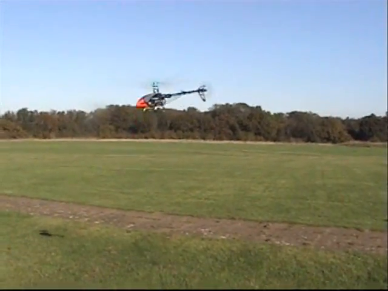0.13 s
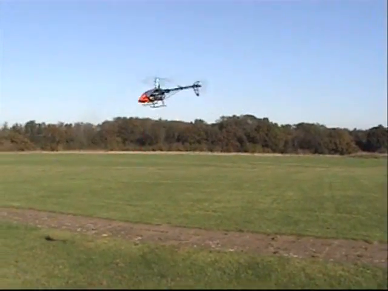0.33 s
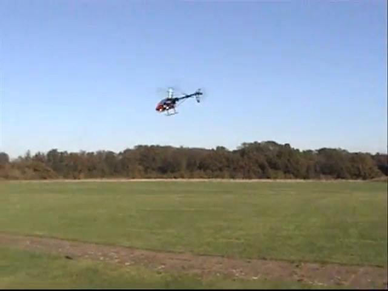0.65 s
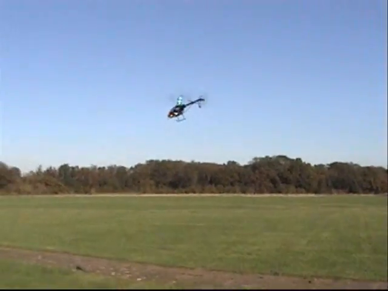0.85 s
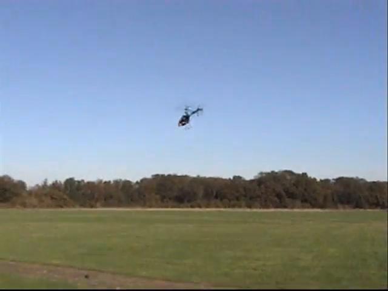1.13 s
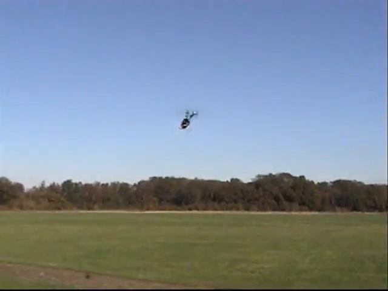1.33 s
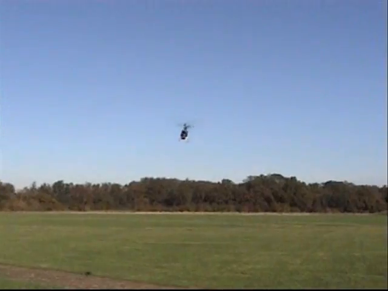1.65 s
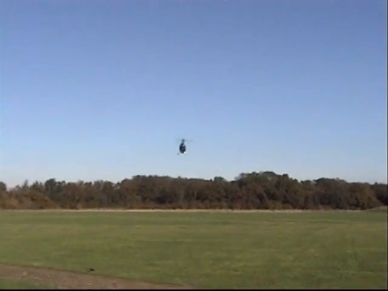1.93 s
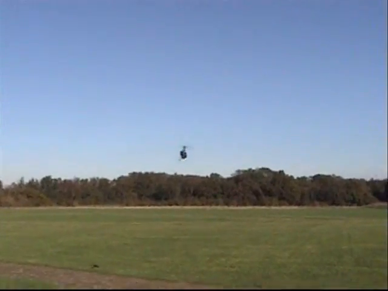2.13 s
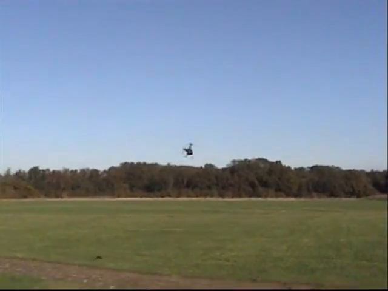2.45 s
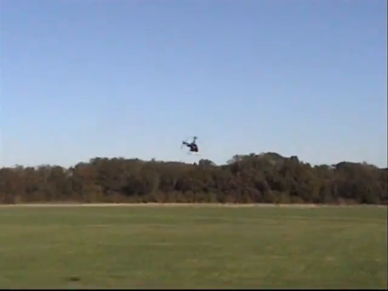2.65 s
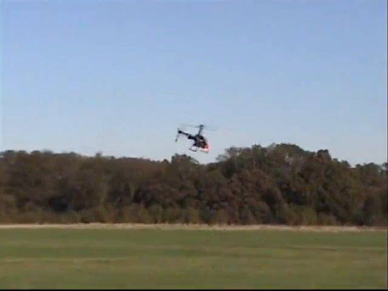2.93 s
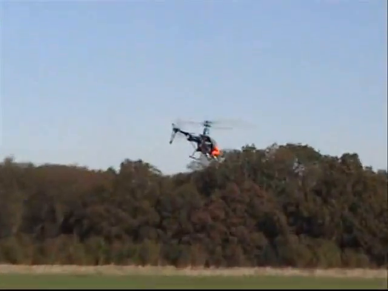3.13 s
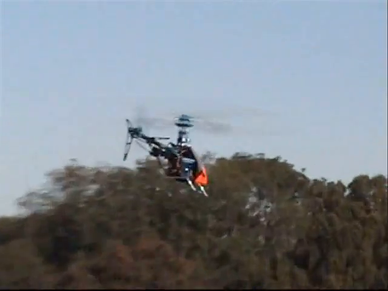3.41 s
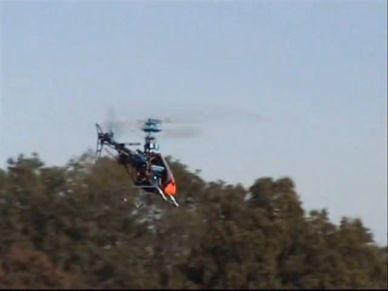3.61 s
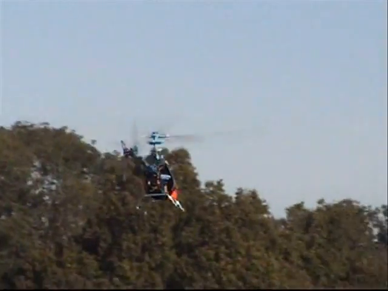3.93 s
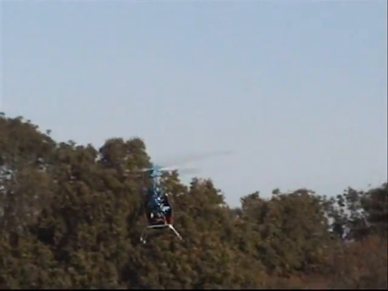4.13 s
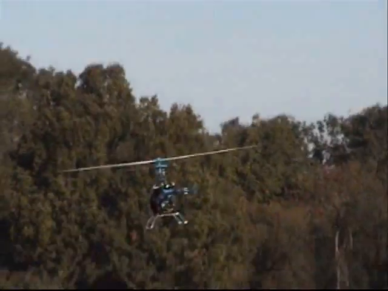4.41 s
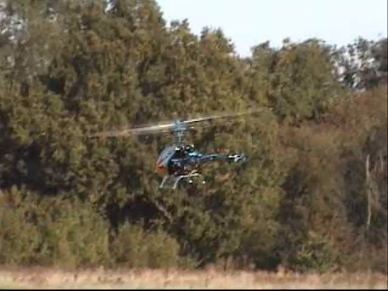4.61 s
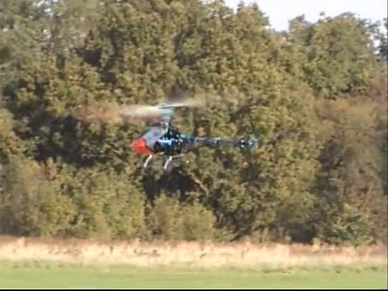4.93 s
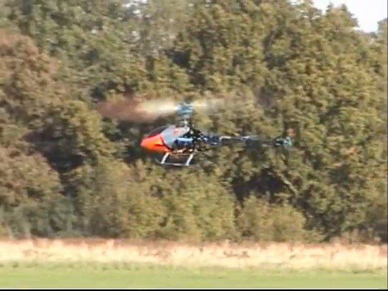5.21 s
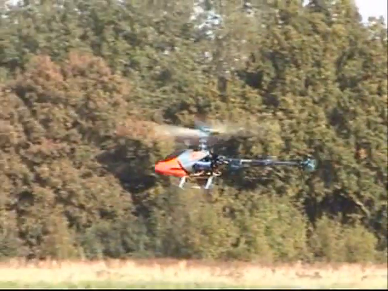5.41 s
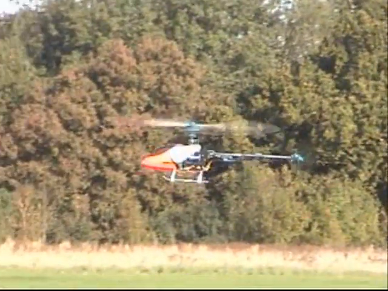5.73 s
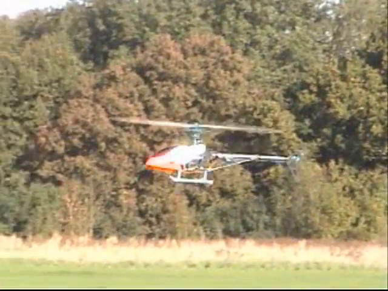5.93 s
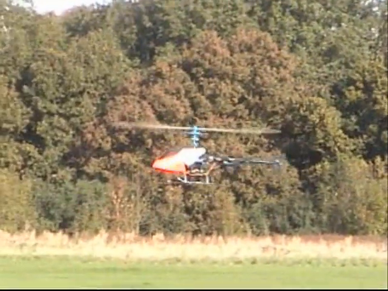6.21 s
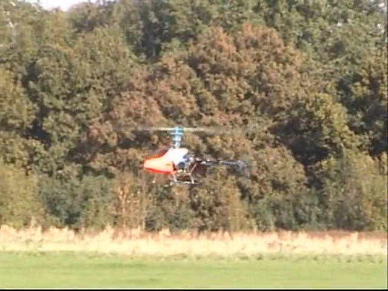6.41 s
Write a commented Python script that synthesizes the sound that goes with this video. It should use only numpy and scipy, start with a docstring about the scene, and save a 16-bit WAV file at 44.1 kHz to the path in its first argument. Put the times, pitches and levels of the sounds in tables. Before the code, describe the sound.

A small electric model helicopter flies over a mown field, heard continuously by a handheld stereo microphone. At 0 s it is nearest and loudest: strong motor tones, a high shimmering gear whine, bright hiss and fast fluttering blade wash. From about 0.5 s the whine locks into a rapid, regular pulse, and the level eases until about 1.8 s. The pitch sags very slightly around 2 s, then recovers. Tail-rotor buzz dips near 1.8 s and becomes prominent from 2.4 to 4 s, while motor tones swell and fade. A short plastic tap lands at 3.7 s and a softer, duller one at 4.4 s. Pitch sags again around 4.5 s; the low buzz then thins away. From 5 s the hover is steadier and softer, with whine and motor tones briefly rising around 5.7 s before easing. Faint grass echo colours the tones, and light wind rumble grows gently. It ends still running.

```python
"""Small electric model helicopter

It circles over a mown field and hovers in front of a hand-held camera.
One rotor speed drives every tone: tail rotor buzz, motor tones and a pulsing gear whine.
Shaped noise makes the hiss of the blades and gears, the ringing frame and the wind.
The grass throws back an echo that comes sooner as the model flies lower; two knocks tap the camera."""
import sys
import numpy as np
from scipy import signal
from scipy.fft import rfft, irfft
from scipy.io import wavfile
from scipy.ndimage import map_coordinates

SR = 44100
rng = np.random.default_rng(int(sys.argv[2]) if len(sys.argv) > 2 else 0)


def to_wav(s):
    """Save 16-bit WAV."""
    ch = np.atleast_2d(s).T  # columns
    pcm = np.round(np.clip(ch, -1, 1) * 32767)  # PCM
    wavfile.write(sys.argv[1], SR, pcm.astype(np.int16))


N = 289296
T = np.arange(N) / SR  # time of each sample, s
HZ = np.fft.rfftfreq(N, 1 / SR)  # frequency of each bin, Hz

# turns of the motor and tail shaft, and beats of the gears, for each turn of the main rotor
MOTOR_RATIO, TAIL_RATIO, BEAT_RATIO = 41 / 3, 17 / 4, 5


def amp(db):
    """Decibels to gain."""
    return 10 ** (np.asarray(db) / 20)


def unit(x):
    """Scales to rms 1."""
    return x / np.sqrt(np.mean(x ** 2) + 1e-20)


def curves(rows):
    """Each column of a timed table, joined by straight lines, at every sample."""
    s, *columns = np.transpose(rows)
    return [np.interp(T, s, column) for column in columns]


def spectrum(points):
    """A table over frequency, at every bin."""
    hz, value = np.transpose(points)
    return np.interp(np.log(HZ + 1), np.log(hz + 1), value)


def noise(gain):
    """Noise of rms 1 with the given relative gain per bin."""
    bins = rng.standard_normal(len(HZ)) + 1j * rng.standard_normal(len(HZ))
    return unit(irfft(gain * bins, N))


def drift(rate_hz, size=4096):
    """A slow random wander of rms 1, moving up to about rate_hz."""
    hz = np.arange(size // 2 + 1) * SR / N
    slow = irfft(rfft(rng.standard_normal(size)) / (1 + (hz / rate_hz) ** 2))
    return np.interp(T, np.linspace(0, T[-1], size), unit(slow))


def tone(turns, db, stray=0):
    """A sine of the given rms level, its phase pushed by stray radians."""
    return np.sqrt(2) * amp(db) * np.cos(2 * np.pi * turns + stray)


def throb(turns, depth):
    """Gain that swells once a turn."""
    return 1 + depth * np.cos(2 * np.pi * turns)


def shaken(turns, db, flutter_db, jitter, rate_hz):
    """A tone whose level (rms dB) and phase (rms radians) flutter in the stirred air."""
    return tone(turns + rng.random(), db + flutter_db * drift(rate_hz), jitter * drift(rate_hz))


def motor(turns):
    """A low hum and three strong multiples of motor speed, throbbing with each turn of the main gear."""
    # which multiples of motor speed sound
    motor_orders = (1, 4, 5, 7)
    # their levels before the trim, swelling and fading through the flight:
    # (t/s, order 1 level/dB, order 4 level/dB, order 5 level/dB, order 7 level/dB)
    motor_levels = [(0, -40, -44, -35, -27.5), (.45, -45, -42, -34, -31), (1.15, -50.5, -43, -45, -45),
                    (1.9, -46, -45, -50, -34), (2.22, -43.5, -41, -46, -28.5), (2.5, -43, -38, -43, -27),
                    (2.9, -48.5, -38.5, -39, -29), (3.5, -48.5, -38.5, -40.5, -31),
                    (4.25, -48.5, -43, -44, -35), (4.85, -47, -44, -53, -39), (5.35, -47.5, -52, -42, -48),
                    (5.72, -45.5, -41, -35.5, -33), (6.05, -47, -40.5, -37, -38), (6.3, -50, -42, -43, -36),
                    (6.56, -49.5, -42, -47, -40)]
    # how deeply they throb with each rotor turn: (t/s, depth 0-1)
    throb_depth = [(0, 0), (2, 0.27), (3.5, 0.19), (4.4, 0.26), (4.8, 0.2), (5.3, 0.23), (6.56, 0.33)]
    depth = np.clip(curves(throb_depth)[0], 0, 1)
    tones = 0
    for k, db in zip(motor_orders, curves(motor_levels)):
        steady = shaken(k * MOTOR_RATIO * turns, db, flutter_db=0.6, jitter=0.12, rate_hz=4)
        tones = tones + steady * throb(turns + rng.random(), depth)
    return amp(-0.2) * tones * throb(2 * turns, depth=0.059)


def gear_whine(turns):
    """Three close tones: in step they pulse five times a rotor turn, out of step they shimmer."""
    whine_order = 11  # middle tone, as a multiple of motor speed
    # the middle tone and one a beat to each side, before the trim:
    # (t/s, lower level/dB, middle level/dB, upper level/dB)
    whine_levels = [(0, -28.5, -30.5, -51), (.6, -31.5, -25, -31), (1.2, -31, -33, -34.5),
                    (1.8, -34.5, -41.5, -32), (2.45, -43.5, -31.5, -32.5), (2.9, -39, -38.5, -35),
                    (3.3, -30.5, -41, -40), (3.45, -38, -38.5, -39.5), (3.7, -31.5, -36, -43),
                    (4.2, -43.5, -46, -39), (4.8, -37.5, -30, -39), (5.1, -36.5, -32.5, -39),
                    (5.4, -60, -42, -41), (5.75, -41, -33.5, -30.5), (6.1, -37.5, -39.5, -51),
                    (6.56, -39.5, -37, -56)]
    # how far the three stray out of step: (t/s, rms phase/radians)
    stray_size = [(0, 3.2), (.5, .05), (1.5, .08), (3, .8), (4.3, 1.3), (4.7, 0.21), (5.2, .2), (5.5, 1.1),
                  (6.56, 1)]
    stray = curves(stray_size)[0]
    shared = .16 * drift(25)  # phase wander common to all three
    tones = 0
    for k, db in enumerate(curves(whine_levels)):
        ratio = whine_order * MOTOR_RATIO + (k - 1) * BEAT_RATIO
        tones = tones + tone(ratio * turns, db + 0.9 * drift(5.1), stray * drift(1.8) + shared)
    # the teeth press hardest on each beat, which sharpens the pulses
    return amp(-0.12) * tones * throb(BEAT_RATIO * turns, depth=0.11) * throb(turns, depth=0.13)


def gear_mesh(turns, near_db):
    """Meshing teeth sound beside motor orders; the low ones carry sideways, the high ones fore and aft."""
    # tones of the meshing teeth: (motor order, beats to the side)
    mesh_orders = [(4, -1), (4, 1), (7, -1), (8, 0), (12, 0)]
    # one row for each: (level/dB at the mean distance before the trim, gain when side on/dB)
    mesh_levels = [(-46.5, 2.5), (-49.5, 8), (-42, -3), (-44, -7.5), (-43.5, -5)]
    # how far the model shows its left flank: (t/s, 0 nose or tail on - 1 side on)
    flank_view = [(0, 0.7), (.6, 1), (1.6, 0), (4.3, 0), (4.8, 0.66), (5.6, 1), (6.56, 1)]
    flank = curves(flank_view)[0]
    tones = 0
    for (k, side), (db, flank_db) in zip(mesh_orders, mesh_levels):
        mesh_turns = (k * MOTOR_RATIO + side * BEAT_RATIO) * turns + 0.26 * drift(0.89)
        tones = tones + shaken(mesh_turns, db + flank_db * flank, flutter_db=1.5, jitter=0.087, rate_hz=7)
    return amp(1.6 * near_db - 1.6) * tones * throb(turns, depth=0.059)


def runout(turns, near_db):
    """A main gear slightly out of true spreads faint tones one rotor turn apart around strong gear tones."""
    # (motor order in the middle, tones to each side)
    runout_orders = [(7, 4), (11, 7)]
    # one for each order: level/dB at the middle, from which the side tones fall 1 dB a step
    runout_levels = [-53, -50]
    tones = 0
    for (k, count), db in zip(runout_orders, runout_levels):
        for side in range(-count, count + 1):
            if side % BEAT_RATIO:  # leaves out the middle and whole beats
                tones = tones + shaken((k * MOTOR_RATIO + side) * turns, db - 1.0 * abs(side),
                                       flutter_db=2.0, jitter=.3, rate_hz=3.3)
    return amp(near_db) * tones


def tail_rotor(turns):
    """Two small blades chop the air: a buzz and its octave."""
    # both tones before their trims, fading as the disc turns to face the camera:
    # (t/s, buzz level/dB, octave level/dB)
    buzz_levels = [(0.03, -46.5, -48), (0.46, -47, -35.5), (1.15, -40.5, -45.5), (1.51, -45, -46),
                   (1.8, -69, -55), (1.94, -47, -52), (2.05, -43.5, -65), (2.43, -37.5, -45),
                   (2.73, -36.5, -50.5), (3.07, -38, -45), (3.76, -38.5, -47), (4.08, -38.5, -61),
                   (4.64, -46, -52.5), (5.04, -59, -38.5), (5.8, -56.5, -51.5), (5.92, -53, -44.5),
                   (6.5, -56.5, -50.5)]
    blade_db, octave_db = curves(buzz_levels)
    blades = 2 * TAIL_RATIO * turns
    buzz = shaken(blades, blade_db, flutter_db=0.7, jitter=.05, rate_hz=12)
    octave = shaken(2 * blades, octave_db, flutter_db=0.7, jitter=.12, rate_hz=9)
    return amp(-1.15) * buzz + amp(-0.1) * octave


def overtones(turns, near_db):
    """Many weaker tones at multiples of the shaft speeds; drive and tail grow louder when near."""
    # drive tones: (motor order, beats to the side)
    drive_orders = [(1, 1), (2, 0), (3, 0), (5, -1), (5, 1), (6, -1), (5, 2), (6, 0), (7, 1), (7, 2),
                    (8, 1), (10, -1), (10, 0), (11, -2), (12, -1), (11, 2), (12, 1), (15, -1)]
    # one for each drive tone: level/dB before distance and trim
    drive_levels = [-47.5, -52, -65, -53, -53.5, -51, -57.5, -52.5, -47.5, -46.5, -51.5, -51.5, -46, -44.5,
                    -46.5, -45, -54, -66.5]
    # tail tones: multiples of tail shaft speed
    tail_orders = (4, 8, 10, 11, 12, 25)
    # one for each tail tone: level/dB before distance and trim
    tail_levels = [-57, -58, -68, -49.5, -54, -54]
    # main rotor tones: multiples of rotor speed
    rotor_orders = (2, 4, 6, 18, 19, 21, 36)
    # one for each rotor tone: level/dB before the trim
    rotor_levels = [-53, -56.5, -59.5, -56, -57.5, -57.5, -60]
    drive = 0
    for (k, side), db in zip(drive_orders, drive_levels):
        # stirred air disturbs high tones more than low ones
        drive = drive + shaken((k * MOTOR_RATIO + side * BEAT_RATIO) * turns, db,
                               flutter_db=1.1 * np.sqrt(k), jitter=0.12 * np.sqrt(k), rate_hz=11)
    tail = sum(shaken(k * TAIL_RATIO * turns, db, flutter_db=3.0, jitter=0.25, rate_hz=1.5)
               for k, db in zip(tail_orders, tail_levels))
    rotor = sum(shaken(k * turns, db, flutter_db=1.0, jitter=0.42, rate_hz=2.8)
                for k, db in zip(rotor_orders, rotor_levels))
    near_tones = drive * throb(turns, depth=0.11) + tail
    return amp(1.0 * near_db - 2.04) * near_tones + amp(0.85) * rotor


def blade_wash(turns, wash_db, bite_db):
    """Turbulence off the main blades, swishing as each one passes, with a brighter edge when they bite."""
    # colour of the wash: (f/Hz, relative level/dB)
    wash_colour = [(100, -7), (220, -4.5), (330, -1), (460, -3.5), (720, 3), (950, 3.5), (1200, -4),
                   (1600, -14), (5000, -34)]
    # colour of its bright edge: (f/Hz, relative level/dB)
    bite_colour = [(700, -29.5), (1100, 2), (1350, 1.5), (1560, -1.5), (1900, -6.5), (2400, 0.5),
                   (3200, -26)]
    edge = amp(bite_db - 6.5) * noise(amp(spectrum(bite_colour)))
    air = noise(amp(spectrum(wash_colour))) + edge
    return amp(wash_db + 2.5) * air * throb(2 * turns, depth=0.23)


def drive_hiss(turns, hiss_db, sheen_db):
    """Rubbing teeth and belt hiss in time with the beat and ring the frame."""
    # colour of the hiss: (f/Hz, relative level/dB)
    hiss_colour = [(900, -35), (1600, -7.5), (1900, -0.5), (2500, -2), (3250, -0.5), (4250, 1), (4900, -1),
                   (6000, -3), (7000, -8), (8300, -35)]
    # colour of its high sheen: (f/Hz, relative level/dB)
    sheen_colour = [(4500, -19.5), (5500, -1), (6400, 1.5), (7000, 1), (7650, 1), (8000, -5), (8300, -37.5)]
    # ringing frame, as bands of noise: (f/Hz, width/Hz, relative level/dB)
    frame_bands = [(3710, 370, 0), (5770, 840, -1.5), (2070, 540, -20)]
    sheen = amp(sheen_db + .5) * noise(amp(spectrum(sheen_colour)))
    hiss = amp(4.0) * noise(amp(spectrum(hiss_colour))) + sheen
    ring = sum(amp(db - 2.5) * noise(1 / (1 + (2 * (HZ - hz) / width) ** 2))
               for hz, width, db in frame_bands)
    beats = BEAT_RATIO * turns
    rub = hiss * throb(beats, depth=0.42) + ring * throb(beats, depth=0.31)
    return amp(hiss_db) * rub * throb(turns, depth=0.069) * throb(MOTOR_RATIO * turns, depth=0.2)


def ground(x, bounce):
    """Adds the late copy off the grass: tones swell and dip as the echo's lag changes."""
    # how late the echo is: (t/s, lag/ms)
    ground_lag = [(0, 4.22), (.5, 4.54), (1, 4.13), (1.6, 4.04), (2, 3.52), (2.5, 2.84), (3, 2.57),
                  (3.5, 2.32), (4, 2.11), (4.5, 1.63), (4.8, 1.33), (5.1, 1.22), (5.6, 1.12), (6.03, .93),
                  (6.56, 1.21)]
    lag = curves(ground_lag)[0] * SR / 1000  # in samples
    echo = map_coordinates(x, [np.arange(N) - lag], order=1)
    return (x + bounce * echo) / np.sqrt(1 + bounce ** 2)


def knocks():
    """Brief taps scuff and ring the camera's plastic case."""
    # each tap: (t/s, level/dB, pitch factor)
    taps = [(3.661, -26.5, 1.0), (4.355, -32, 0.35)]
    # ringing of the case before the pitch factor: (f/Hz, relative level/dB, time to fall 60 dB/s)
    case_modes = [(875, -5, 0.079), (1230, -11, .04), (1450, -4.5, 0.044), (1710, -13.5, 0.027),
                  (1910, -4, 0.017)]
    # colour of the scuff: (f/Hz, relative level/dB)
    scuff_colour = [(400, -20), (800, 3.5), (1800, 1), (2600, -3), (4500, -18)]
    out, t = np.zeros(N), T[:SR // 8]
    for s, level_db, pitch in taps:
        ring = 0
        for hz, db, t60 in case_modes:
            fade = np.exp(-np.log(1000) * t / t60)
            ring = ring + amp(db) * fade * np.sin(2 * np.pi * (hz * pitch * t + rng.random()))
        scuff = amp(-8) * noise(amp(spectrum(scuff_colour)))[:len(t)] * np.exp(-t / 0.015)
        out[round(s * SR):][:len(t)] += amp(level_db) * (amp(3.0) * ring + scuff)
    return out


def wind():
    """A light breeze rumbles on the microphone, mostly alike in both ports."""
    # colour of the rumble: (f/Hz, relative level/dB)
    wind_colour = [(15, -33.5), (30, -18.5), (50, -5.5), (80, 0.5), (120, -2.5), (200, -6.5), (350, -13.5),
                   (800, -32)]
    # the breeze picks up: (t/s, level/dB before the trim)
    gusts = [(0, -48), (2.5, -44.5), (6.56, -42)]
    shared, left, right = (noise(amp(spectrum(wind_colour))) for _ in range(3))
    return amp(curves(gusts)[0] - 1.3) * (shared + 0.5 * np.array([left, right]))


def scene():
    """The helicopter with its ground echo, noise that widens the sound, wind and knocks."""
    # main rotor speed as heard, sagging under load in the two turns: (t/s, speed/turns per second)
    rotor_speed = [(0, 39.595), (.2, 39.467), (.6, 39.325), (1.0, 39.25), (1.45, 39.225), (2.0, 39.09),
                   (2.35, 39.345), (2.8, 39.44), (3.4, 39.48), (4.15, 39.165), (4.6, 39.1), (5.0, 39.485),
                   (5.2, 39.49), (5.45, 39.41), (6.0, 39.49), (6.56, 39.5)]
    # how close the model is: (t/s, level against its mean distance/dB)
    closeness = [(0, 5), (.9, 2.5), (1.8, 0.55), (2.5, 1.4), (3.6, 0.2), (4.3, -1.5), (5.2, -2),
                 (5.75, -1.3), (6.56, -4)]
    # how hard the main blades bite: (t/s, bright edge before its trim/dB)
    blade_load = [(0, 6), (1.2, 6.5), (1.75, -4), (2.15, 6), (2.6, -13), (3.15, 0.5), (3.9, -4), (4.75, -7),
                  (5.15, -0.5), (6.56, 3)]
    # grass reflects better at a grazing angle: (t/s, gain of the echo)
    ground_bounce = [(0, 0.071), (2.5, 0.34), (6.56, 0.25)]
    turns = np.cumsum(curves(rotor_speed)[0]) / SR
    near_db, bite_db = curves(closeness)[0], curves(blade_load)[0]
    # levels before the trims: dB at the mean distance, plus dB for each dB of closeness
    hiss_db = -40 + 0.92 * near_db
    wash_db = -45.5 + .55 * near_db
    sheen_db = 0.06 + 0.5 * near_db
    rush = blade_wash(turns, wash_db, bite_db) + drive_hiss(turns, hiss_db, sheen_db)
    tones = motor(turns) + gear_mesh(turns, near_db) + gear_whine(turns)
    tones = tones + overtones(turns, near_db) + runout(turns, near_db)
    # wash and hiss that differ between the two ports, widening the sound
    wide_rush = np.array([amp(-5.5) * blade_wash(turns, wash_db, bite_db)
                          + amp(-8.0) * drive_hiss(turns, hiss_db, sheen_db) for _ in range(2)])
    model = ground(rush + tones, curves(ground_bounce)[0]) + tail_rotor(turns)
    return model + knocks() + wide_rush + wind()


def record(dry):
    """Two microphone ports of slightly different colour and timing, then the band limit."""
    edge_hz = 8200  # top of the band
    # (f/Hz, left minus right level/dB)
    port_balance = [(60, -3), (88, 1.5), (130, -1.5), (190, 1), (270, 1), (400, -1), (580, -4), (850, -1),
                    (1240, -4), (1810, -6), (2640, -6.5), (3860, -2.5), (5630, 0.5), (8220, 4)]
    # (f/Hz, phase by which left leads/radians)
    port_phase = [(0, 0), (950, -0.25), (1460, -0.93), (1720, 0.2), (2150, -0.1), (3450, 0.79),
                  (4310, 0.71), (4910, 0.63), (7410, 0.3), (8350, -0.1)]
    # each port takes half of the difference
    half = amp(spectrum(port_balance) / 2) * np.exp(.5j * spectrum(port_phase))
    ports = np.array([half, 1 / half])
    heard = irfft(rfft(dry) * ports / abs(ports.mean(0)), N)
    low_pass = signal.firwin(401, edge_hz, window=("kaiser", 9), fs=SR)
    return signal.oaconvolve(heard, low_pass[None], "same")


dry = scene()
out = record(dry)
to_wav(out)
```